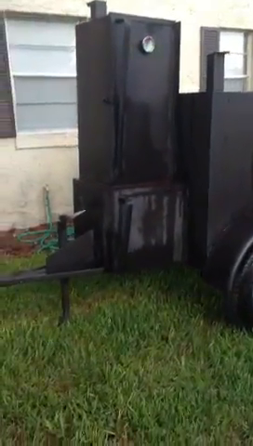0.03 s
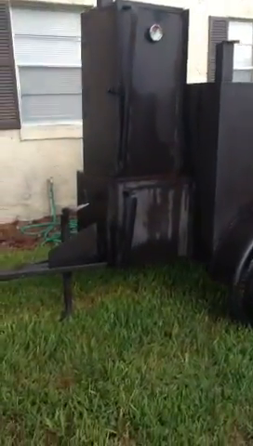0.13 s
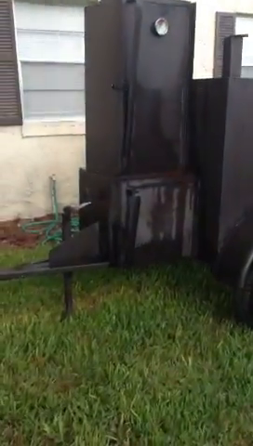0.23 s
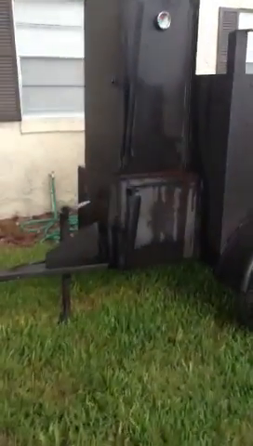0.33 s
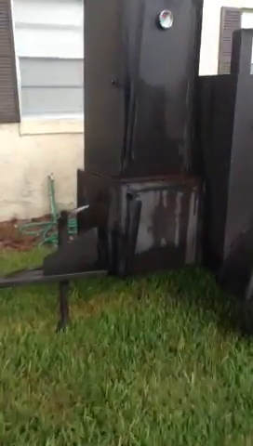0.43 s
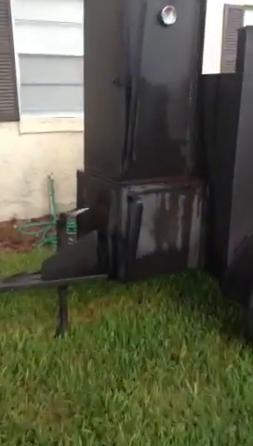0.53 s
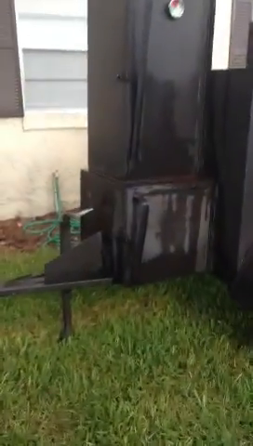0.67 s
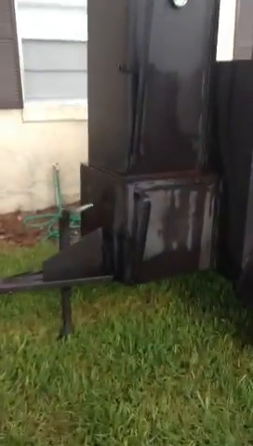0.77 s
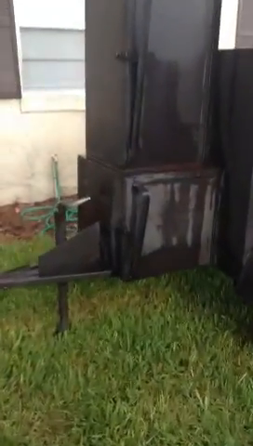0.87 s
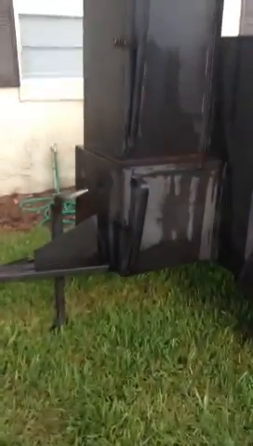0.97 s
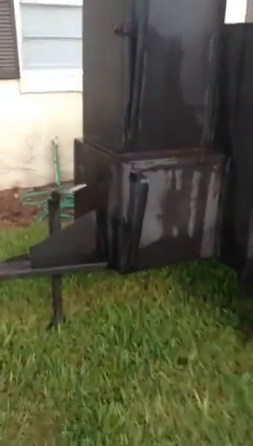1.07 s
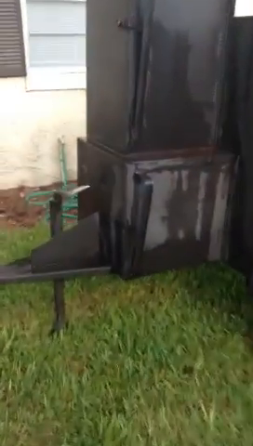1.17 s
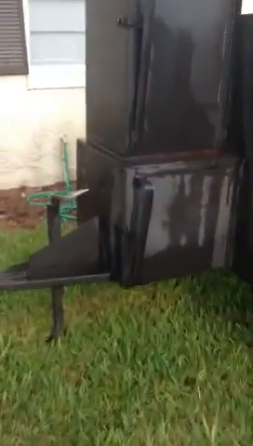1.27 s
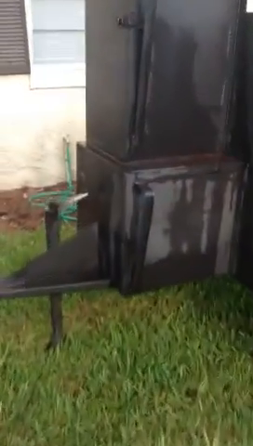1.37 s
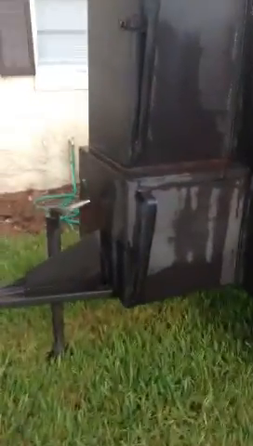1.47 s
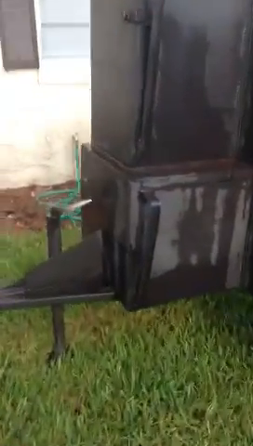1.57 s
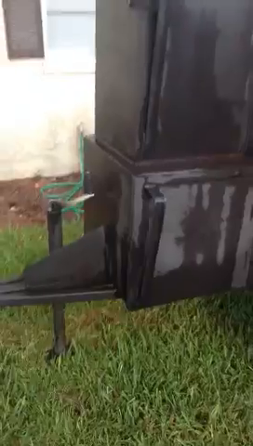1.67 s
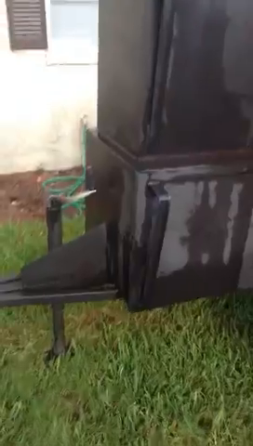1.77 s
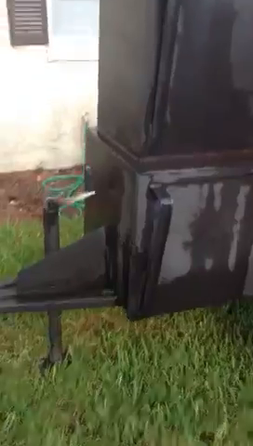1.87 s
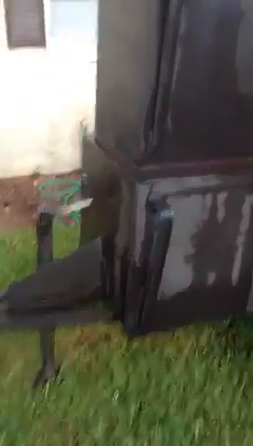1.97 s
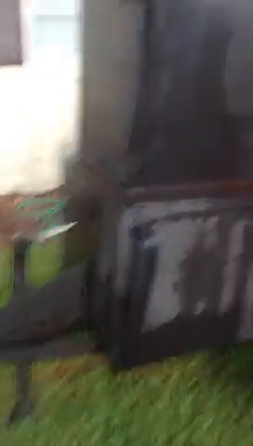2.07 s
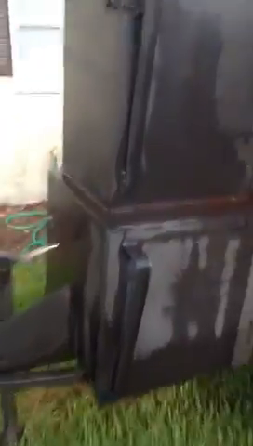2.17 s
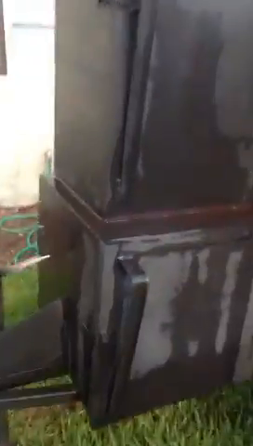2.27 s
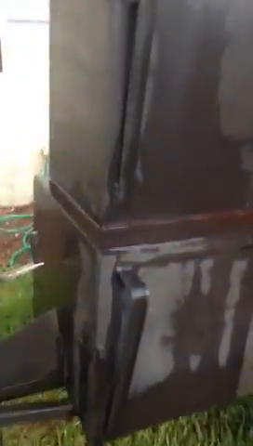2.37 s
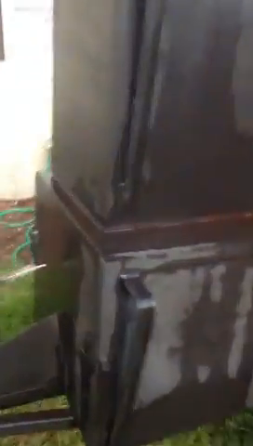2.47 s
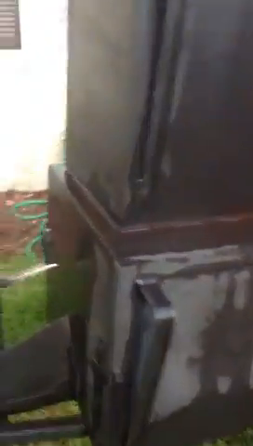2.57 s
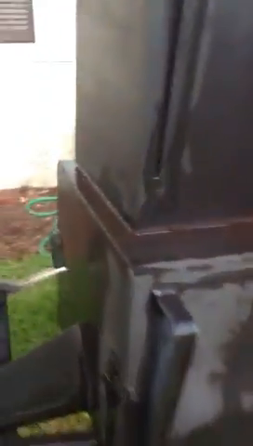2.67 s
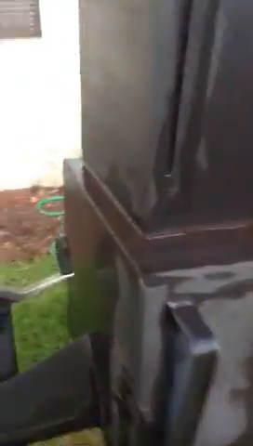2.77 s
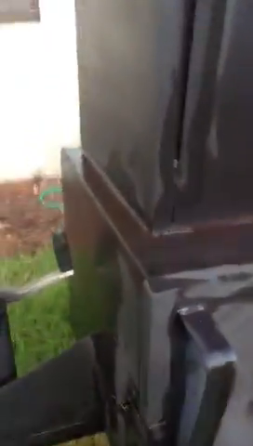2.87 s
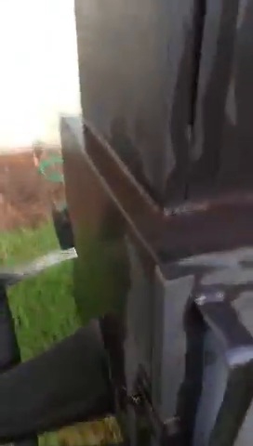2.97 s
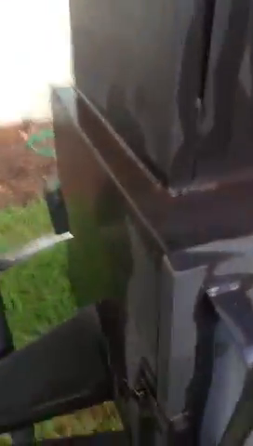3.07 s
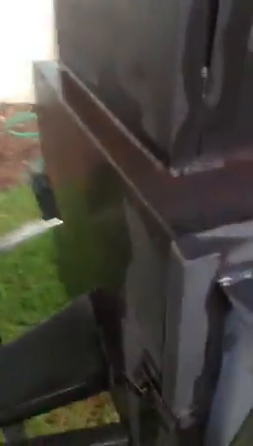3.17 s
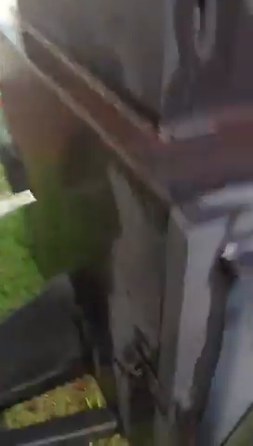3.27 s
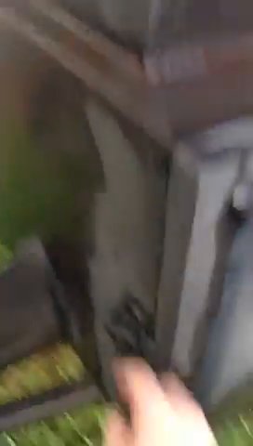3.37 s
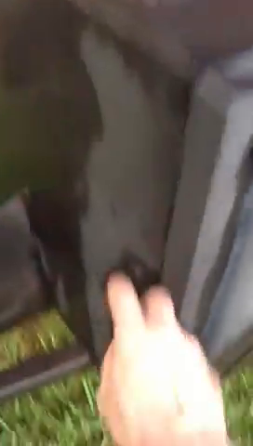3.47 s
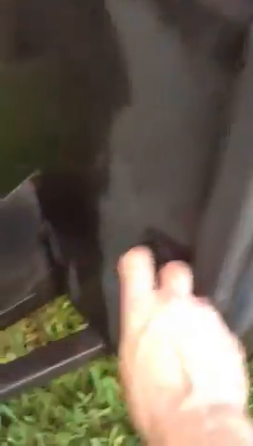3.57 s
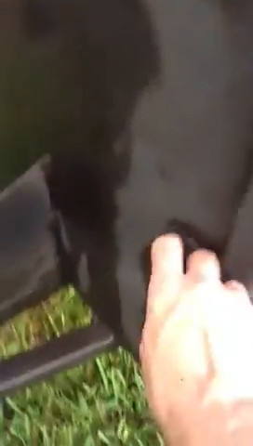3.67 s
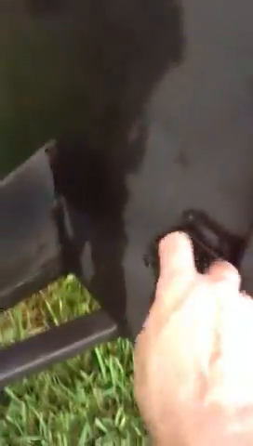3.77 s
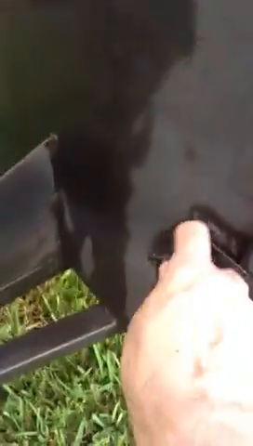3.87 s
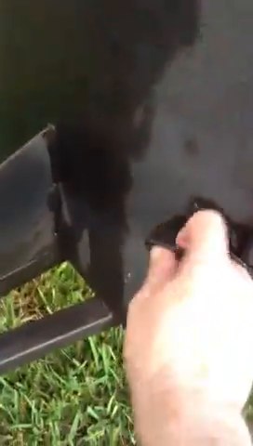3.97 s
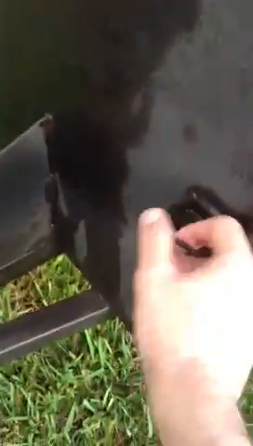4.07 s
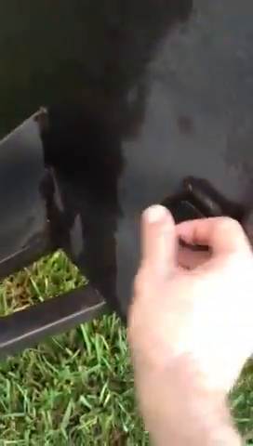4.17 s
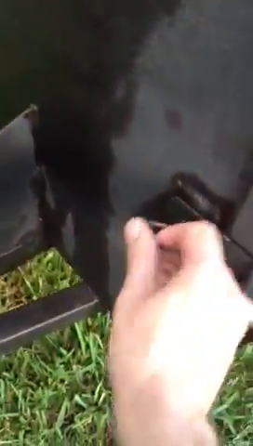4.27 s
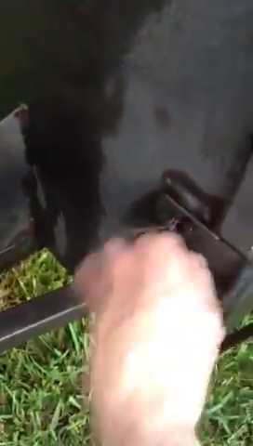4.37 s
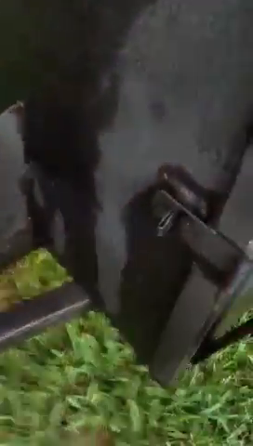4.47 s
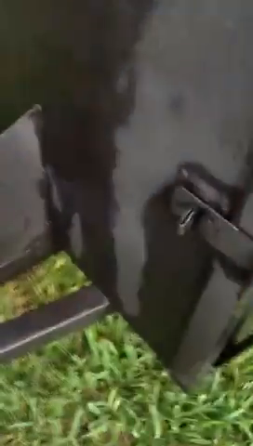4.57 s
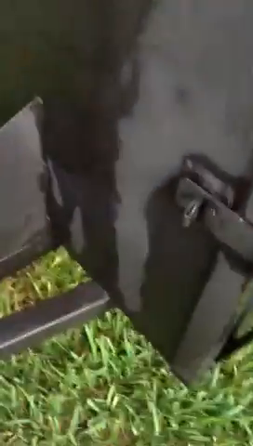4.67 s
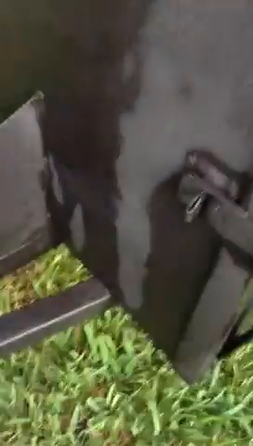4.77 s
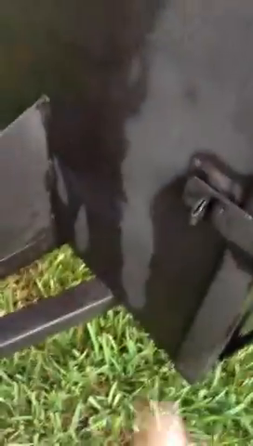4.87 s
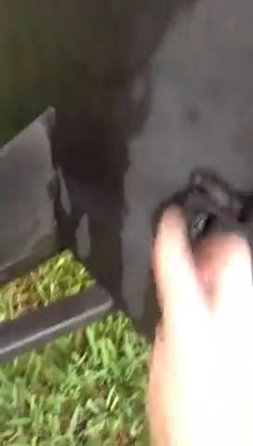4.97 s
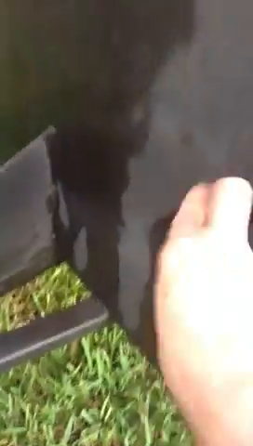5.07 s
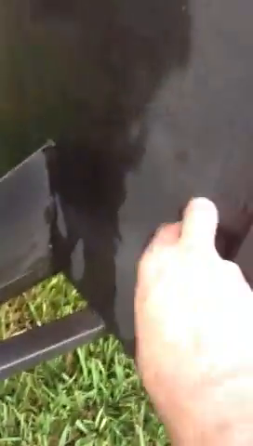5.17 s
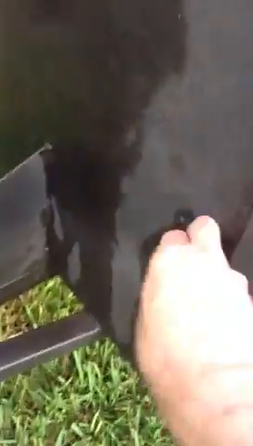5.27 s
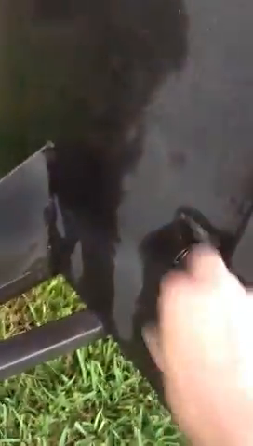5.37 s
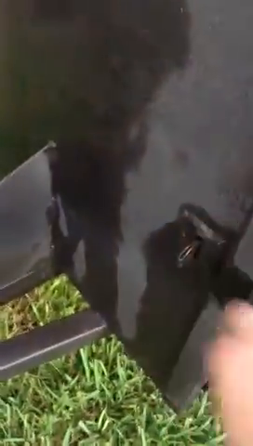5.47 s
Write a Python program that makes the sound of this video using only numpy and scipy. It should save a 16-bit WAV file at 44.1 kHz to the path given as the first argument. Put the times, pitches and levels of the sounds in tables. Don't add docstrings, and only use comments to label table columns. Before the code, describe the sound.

A steady, bright cicada hiss fills the open garden throughout, with two nearer insects buzzing at a reedy pulse, a faint leafy breeze and low far-off traffic. The chorus swells slightly until about 3.3 s, then drops a little. From 0.3 to 3.6 s, quiet irregular steps brush the lawn, dull crunches with crisp swishes, clearer around 0.9, 1.7 and 2.5 s; a tiny tick falls at 2.5. At 3.5 s close metal contact begins: small sharp ticks, light knocks and short scrapes around 3.8 and 4.0. A quick rub and click at 4.37-4.40 leads to one very loud, hard snap at 4.41, with a short low thump of air and a dull hollow steel ring. Insects remain alone until knocks at 5.08 and 5.17, then a gritty scrape and clanking cluster at 5.2-5.3, a door knock at 5.36 with fading rocking, and a last light tap at 5.49. Close, mono, nearly dry.

```python
import sys
import numpy as np
from scipy import signal
from scipy.fft import rfft, irfft
from scipy.io import wavfile
from scipy.ndimage import uniform_filter1d

SR = 44100
rng = np.random.default_rng(int(sys.argv[2]) if len(sys.argv) > 2 else 0)


def persist_wave(psi):
    counts = np.round(np.clip(psi, -1, 1) * 32767).astype(np.int16)
    wavfile.write(sys.argv[1], SR, np.atleast_2d(counts).T)


def voltage_ratio(level):
    return 10 ** (np.asarray(level, float) / 20)


N = 242991
T_S = np.arange(N) / SR

# start_s, signed_peak, pitch_hz, t60_s
SNAP = [
    (4.4114, -1.05, 520, .0045),
    (4.4121, .46, 178, .019),
]
SEATED_S = 4.4122


def rms_one(x):
    return x / np.sqrt(np.mean(x ** 2) + 1e-20)


def in_time(rows):
    s, *columns = np.transpose(rows)
    return [np.interp(T_S, s, column) for column in columns]


def drift(rate):
    r = np.exp(-80 * np.pi * rate / SR)
    noise = rng.standard_normal(N // 40 + 2002)
    slow = signal.lfilter([1], [1, -2 * r, r * r], noise)[2000:]
    return np.interp(np.arange(N) / 40, np.arange(len(slow)), rms_one(slow))


def band(x, low_hz, high_hz):
    edges_hz = [low_hz, min(high_hz, .45 * SR)]
    return signal.sosfilt(signal.butter(2, edges_hz, "band", fs=SR, output="sos"), x)


def ring(clicks, hz, t60_s):
    r = voltage_ratio(-60 / (t60_s * SR))
    w = 2 * np.pi * hz / SR
    return signal.lfilter([0, np.sin(w)], [1, -2 * r * np.cos(w), r * r], clicks + 1e-18)


def coloured(spectrum, patchy_db):
    hz, level_db = np.transpose(spectrum)
    bin_hz = np.maximum(np.arange(N // 2 + 1) * SR / N, 1)
    gain_db = np.interp(np.log(bin_hz), np.log(hz), level_db, -90, -90)
    shaped = rfft(rng.standard_normal(N)) * voltage_ratio(gain_db)
    third_octave = 3 * np.log2(bin_hz / hz[0])
    out = np.zeros(N)
    for k in range(int(3 * np.log2(hz[-1] / hz[0])) + 2):
        share = np.clip(1 - abs(third_octave - k), 0, 1)
        wander_db = patchy_db * (drift(0.49) + 0.27 * drift(4.9))
        out += irfft(shaped * share, N) * voltage_ratio(wander_db)
    return rms_one(out)


def grains(per_s, spread_db):
    sizes = voltage_ratio(spread_db * np.minimum(rng.exponential(1, N), 4)) * rng.choice([-1, 1], N)
    return rms_one(sizes * (rng.random(N) < per_s / SR))


def traffic():
    # pitch_hz, level_db_per_hz
    spectrum = [(18, -69), (30, -39), (54, -19), (107, -5), (135, -7), (161, -2), (229, 1), (373, -5),
                (1300, -6), (2250, -16.5), (3200, -7.5), (4160, -35), (7040, -120)]
    # time_s, shelter_0_to_1
    shelter_curve = [(0, 0), (2.7, .1), (3.3, 0.46), (4.7, 1), (5.51, 0.4)]
    (shelter,) = in_time(shelter_curve)
    return voltage_ratio(-50.5 - 2.5 * shelter) * coloured(spectrum, patchy_db=0.0)


def chorus():
    # pitch_hz, level_db_per_hz
    spectrum = [(1410, -16), (2400, -13.5), (2940, -14), (3430, -1), (4030, -2), (4470, 0), (5440, -1),
                (6310, -1), (6730, 0), (8610, -7), (9500, -8), (12400, -20.5), (20900, -120)]
    # time_s, level_db
    swell = [(0, -45.5), (.6, -45), (1.4, -44.5), (2.3, -44), (3.27, -43.5), (3.7, -47), (5.51, -47)]
    (level_db,) = in_time(swell)
    return voltage_ratio(level_db) * coloured(spectrum, patchy_db=0.95)


def leaves():
    # pitch_hz, level_db_per_hz
    spectrum = [(4710, -10.5), (8000, -3.5), (8790, -3.5), (11200, -6.5), (13500, -10.5), (15600, -17.5),
                (15800, -30)]
    # time_s, level_db
    breeze = [(0, -48.5), (1.1, -47.5), (1.5, -50), (2.3, -52), (3.4, -53), (3.7, -51), (5.51, -51.5)]
    (level_db,) = in_time(breeze)
    return voltage_ratio(level_db) * coloured(spectrum, patchy_db=1.5)


def cicada(rate, heard, jitter, skirt_db, width_hz):
    (per_s,), (level_db, body_hz) = in_time(rate), in_time(heard)
    phase = 2 * np.pi * np.cumsum(per_s * (1 + jitter * drift(24.6))) / SR
    out = np.zeros(N)
    for k in range(8, 20):
        lift = voltage_ratio(skirt_db) + np.exp(-.5 * ((k * per_s - body_hz) / width_hz) ** 2)
        fade = voltage_ratio(3.06 * drift(3.8))
        out += lift * fade * np.sin(k * phase + 0.51 * drift(3.3))
    throb_hz = 44.17 * (1 + 0.0239 * drift(1.0))
    throb = 1 + .5 * np.sin(2 * np.pi * np.cumsum(throb_hz) / SR)
    return voltage_ratio(level_db) * throb * rms_one(out)


def near_cicadas():
    # time_s, pulses_per_s
    first_rate = [(0, 381.2), (1.2, 382), (1.75, 385), (3.1, 385.3), (3.8, 385.8), (4.8, 386.9), (5.5, 390)]
    second_rate = [(0, 427), (1.6, 427.5), (2.3, 423), (5.5, 424.5)]
    # time_s, level_db, body_hz
    first_heard = [(0, -51, 6200), (.8, -51.5, 6070), (1.3, -48, 6300), (1.75, -48.5, 6270),
                   (2.2, -58, 5800), (2.9, -52.5, 4550), (3.3, -49.5, 5300), (3.9, -49.5, 5360),
                   (4.8, -50.5, 5900), (5.5, -48.5, 5530)]
    second_heard = [(0, -61, 3320), (1.0, -59, 3400), (1.6, -55.5, 3600), (2.1, -61, 3300),
                    (2.3, -56, 6780), (2.6, -48.5, 6500), (3.5, -58, 6800), (4.4, -51.5, 6800),
                    (4.602, -53, 4200), (5.1, -54, 4180), (5.5, -61, 7100)]
    first = cicada(first_rate, first_heard, jitter=.0036, skirt_db=-7, width_hz=450)
    return first + cicada(second_rate, second_heard, jitter=.0045, skirt_db=-10, width_hz=350)


def steps():
    # start_s, length_s, crunch_db, swish_db
    footfalls = [(.25, .1, -70, -68), (0.898, 0.25, -53, -54), (1.193, .08, -66, -65),
                 (1.698, 0.15, -55.5, -52), (1.96, 0.21, -72, -56), (2.45, 0.21, -49.5, -51),
                 (2.812, 0.067, -53, -68), (3.06, 0.16, -55, -59), (3.266, 0.053, -55, -51),
                 (3.517, 0.12, -51, -57)]
    crunch = rms_one(band(grains(3000, spread_db=3.0), 700, 3000))
    swish = rms_one(band(grains(9000, spread_db=3.0), 11000, 16000))
    out = np.zeros(N)
    for start_s, length_s, crunch_db, swish_db in footfalls:
        swell = np.sin(np.pi * np.clip((T_S - start_s) / length_s, 0, 1) ** 0.45)
        out += swell * (voltage_ratio(crunch_db) * crunch + voltage_ratio(swish_db) * swish)
    return out


def slides():
    # start_s, hardest_s, end_s, grind_db, squeak_over_grind_db
    strokes = [
        (3.763, 3.79, 3.85, -43.5, -9),
        (4.024, 4.025, 4.105, -41.5, -10),
        (4.36, 4.402, 4.38, -43, 0),
        (4.398, 4.409, 4.412, -26.5, -3),
        (5.208, 5.244, 5.336, -33.5, -6),
    ]
    faint_db = -55
    slips = grains(5000, spread_db=2.0) * voltage_ratio(2.25 * drift(120))
    grind = rms_one(band(slips, 500, 3900))
    squeak = rms_one(band(slips, 2400, 5100))
    hiss = rms_one(band(slips, 7000, 24000))
    out = np.zeros(N)
    for start_s, hardest_s, end_s, grind_db, squeak_db in strokes:
        press_db = np.interp(T_S, [start_s, hardest_s, end_s], [faint_db, grind_db, faint_db])
        hiss_db = -3.5 + .5 * (press_db - grind_db)
        rub = grind + voltage_ratio(squeak_db) * squeak + voltage_ratio(hiss_db) * hiss
        out += (T_S > start_s) * (T_S < end_s) * voltage_ratio(press_db) * rub
    return out


def shudder(scrape):
    t60_s = 0.96
    r = voltage_ratio(-120 / (t60_s * SR))
    energy = signal.lfilter([1 - r], [1, -r], scrape ** 2 + 1e-18)
    return voltage_ratio(-3) * np.sqrt(energy) * rms_one(band(rng.standard_normal(N), 128, 740))


def door(scrape):
    # pitch_hz, level_db, t60_s
    modes = [(122.5, -5, 0.53), (137.3, -13, 0.94), (148.3, -4, 1), (153, 7, 0.16), (170.8, -7, 0.74),
             (186.4, -12, 1), (207, -3, 1), (222, -11, 0.78), (235, -2.5, 0.75), (258, -1.5, 0.56),
             (300, -0.5, 0.25), (348.6, 1.5, 0.64), (398, -3, 0.92), (431, -2.5, 0.35), (488, -4, 0.21),
             (520, -0.5, 0.43), (581, -13.5, 0.1), (680, -1, 0.17), (716, -1.5, 0.04), (770, -0.5, 0.15),
             (888, -11, 0.39), (930, -6.5, 0.11), (966, -22, 0.17), (1005, -11.5, 0.54), (1106, -5.5, 0.22),
             (1210, -2, 0.071), (1310, -2, 0.11), (1400, -13, 0.18), (1420, -19, 0.085), (1437, 1, 0.13)]
    # start_s, level_db, favoured_hz
    knocks = [(3.5285, -47.5, 300), (3.5305, -46, 520), (3.674, -46, 520), (3.787, -44, 700),
              (3.7986, -50, 690), (3.816, -49, 173), (3.927, -47, 696), (3.9965, -44, 520),
              (4.0252, -47, 520), (4.0252, -42.5, 272), (4.0362, -41.5, 165.5), (4.05, -48, 117),
              (4.373, -33, 166), (4.4045, -32, 1260), (4.411, -36, 197), (4.4113, -44, 151),
              (4.4117, -41, 254), (4.4205, -38, 480), (5.081, -36.5, 159), (5.085, -42.5, 716),
              (5.086, -42, 1437), (5.165, -40, 714), (5.230, -34, 770), (5.243, -29.5, 453),
              (5.2494, -34.5, 430), (5.2612, -39.5, 431), (5.291, -42, 695), (5.355, -31, 1016),
              (5.487, -38, 940), (5.495, -44, 520)]
    favour_octaves, other_modes_db = .13, -19
    rocking = [(5.374 + k * 0.043, -51 + k * -2, 228) for k in range(4)]
    start_s, ring_db, favoured_hz = np.transpose(list(knocks) + rocking)
    at = (start_s * SR).round().astype(int)
    uneven_db = 1.5 * rng.standard_normal((len(at), len(modes)))
    out = np.zeros(N)
    for k, (hz, level_db, t60_s) in enumerate(modes):
        off_octaves = np.log2(hz / favoured_hz)
        share = voltage_ratio(other_modes_db) + np.exp(-.5 * (off_octaves / favour_octaves) ** 2)
        clicks = scrape.copy()
        np.add.at(clicks, at, share * voltage_ratio(ring_db + uneven_db[:, k]))
        push = band(clicks, 0.55 * hz, 1.64 * hz)
        out += (-1) ** k * voltage_ratio(level_db) * ring(push, hz, t60_s)
    return out


def ticks():
    # start_s, level_db, pitch_hz
    pings = [(3.5268, -22, 4150), (3.529, -31, 7160), (3.7986, -23.5, 7660), (3.9957, -30, 4530),
             (4.0252, -27, 7050), (4.0364, -21.5, 8800), (4.4112, -9.5, 7500), (4.4115, -10, 11500),
             (4.4118, -14.5, 3350), (4.4205, -28.5, 11300), (5.2473, -14.5, 13100), (5.2494, -21.5, 6960)]
    # start_s, level_db, pitch_hz
    clacks = [(2.5189, -35, 424), (2.519, -35.5, 1180), (2.547, -36, 2800), (3.431, -41.5, 2230),
              (3.503, -39.5, 2450), (3.5305, -27.5, 3550), (3.533, -37.5, 615), (3.776, -35.5, 2520),
              (3.787, -34.5, 1210), (3.803, -30.5, 2300), (3.816, -45, 1490), (3.927, -39, 2180),
              (4.0252, -29, 2850), (4.037, -27, 2930), (4.05, -42, 700), (4.256, -44, 2200),
              (4.387, -28, 3000), (4.4045, -19, 3250), (4.405, -19.5, 12000), (5.083, -40, 680),
              (5.165, -42.5, 2200), (5.221, -32, 2500), (5.2305, -25, 4040), (5.243, -28, 4000),
              (5.255, -34, 3520), (5.2612, -24.5, 915), (5.272, -42, 4500), (5.291, -32, 3480),
              (5.487, -36.5, 2460)]
    rows = [(s, db, hz, .009 * np.exp(-.04 * (db + 25))) for s, db, hz in pings]
    rows += [(s, db, hz, 0.027 * np.exp(0.09 * (db + 44))) for s, db, hz in clacks]
    out, span_s = np.zeros(N + 4000), np.arange(4000) / SR
    noise = rng.standard_normal((len(rows), 4000))
    noise[:, 0] = -3.0
    for (s, tick_db, hz, t60_s), burst in zip(rows, noise):
        burst = band(burst * voltage_ratio(-60 * span_s / t60_s), 0.75 * hz, 1.257 * hz)
        stilled = (s < SNAP[0][0] - .002) & (s + span_s > SEATED_S)
        burst = burst * np.where(stilled, voltage_ratio(-22), 1)
        out[round(s * SR):][:4000] += voltage_ratio(tick_db) * burst / abs(burst).max()
    return out[:N]


def snap():
    deep_thump = (SEATED_S, 0.13, 35.7, 0.13)
    out = np.zeros(N)
    for start_s, peak, hz, t60_s in list(SNAP) + [deep_thump]:
        click = 1. * (np.arange(N) == round(start_s * SR))
        out += peak * ring(click, hz, t60_s)
    return out


def latch():
    sliding = slides()
    held = abs(T_S - SEATED_S) < .06
    stirring = sliding * np.where(held, voltage_ratio(-12), 1)
    out = ticks() + sliding + snap() + door(voltage_ratio(-40.0) * stirring) + shudder(stirring)
    lag = round(.021 * SR)
    out[lag:] += voltage_ratio(-28) * band(out, 150, 3200)[:-lag]
    return out


def scene():
    garden = traffic() + chorus() + leaves() + near_cicadas()
    return np.tile(garden + steps() + latch(), (2, 1))


def drop_weak_treble(x):
    # pitch_hz, level_db
    weak = [(10000, -87), (12500, -86.5), (14000, -87.5), (15300, -90.5)]
    hz, _, cells = signal.stft(x, SR, window="cosine", nperseg=2048, noverlap=1024)
    cell_power = uniform_filter1d(abs(cells) ** 2, size=2, axis=0)
    cell_power = uniform_filter1d(cell_power, size=2, axis=1)
    faintest_db = np.interp(hz, *np.transpose(weak), left=-200)
    cells[cell_power < voltage_ratio(2 * faintest_db)[:, None]] = 0
    return signal.istft(cells, SR, window="cosine", nperseg=2048, noverlap=1024)[1][:N]


def band_limit(x):
    return signal.sosfilt(signal.butter(12, 16390, fs=SR, output="sos"), x)


def record(dry):
    mono = signal.sosfilt(signal.butter(3, 95, "high", fs=SR, output="sos"), dry[0])
    mono = mono + voltage_ratio(-86) * rms_one(band(rng.standard_normal(N), 21, 160))
    mono = signal.sosfilt(signal.ellip(8, .3, 30, 15330, fs=SR, output="sos"), mono)
    mix = np.tile(drop_weak_treble(mono), (2, 1))
    return band_limit(mix)


dry = scene()
out = record(dry)
persist_wave(out)
```